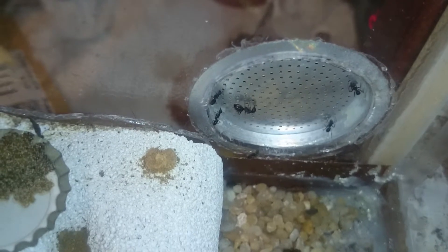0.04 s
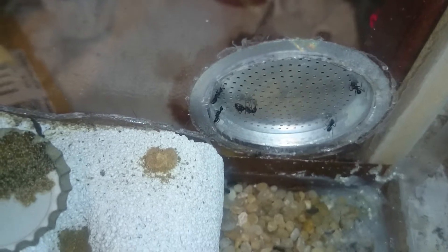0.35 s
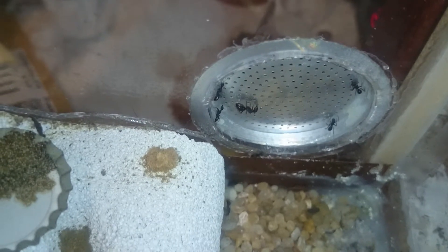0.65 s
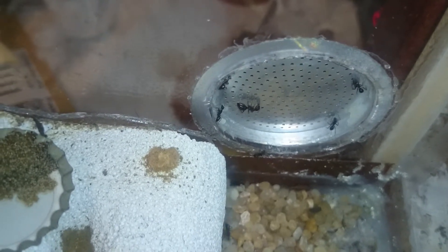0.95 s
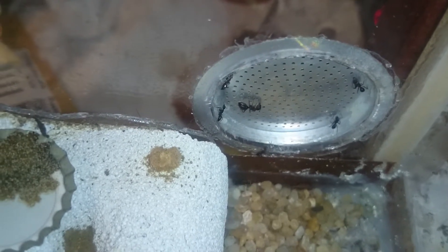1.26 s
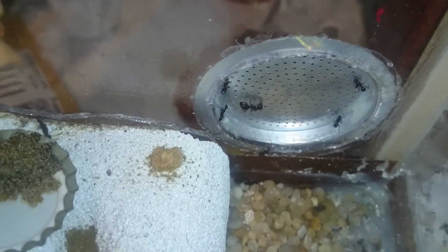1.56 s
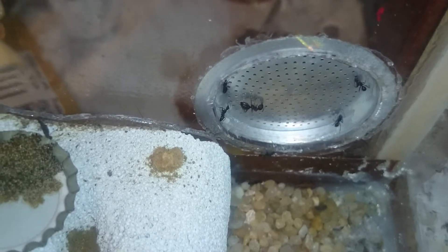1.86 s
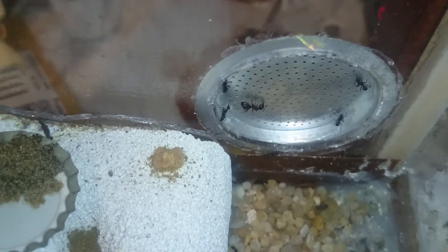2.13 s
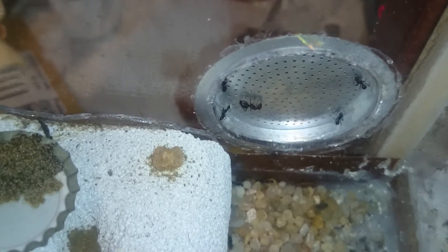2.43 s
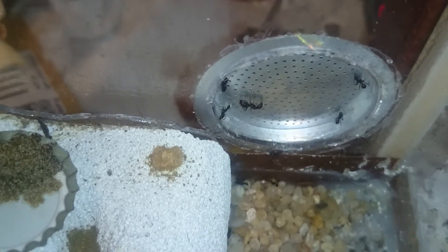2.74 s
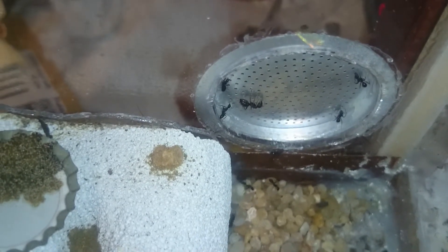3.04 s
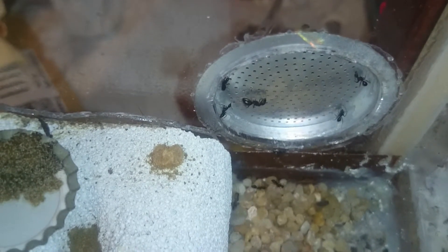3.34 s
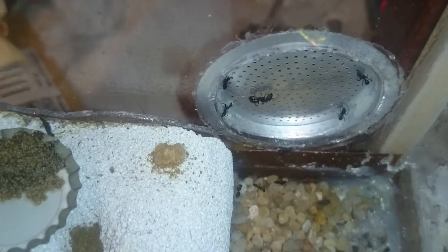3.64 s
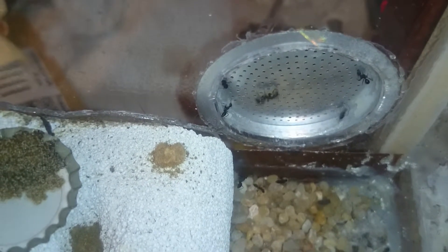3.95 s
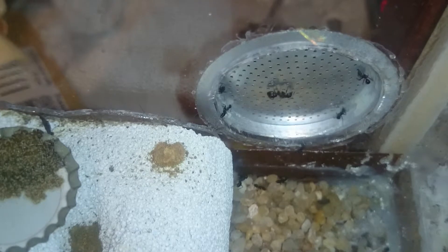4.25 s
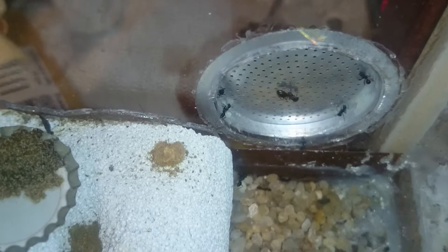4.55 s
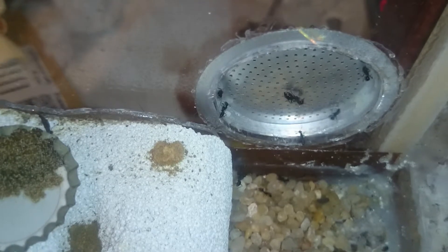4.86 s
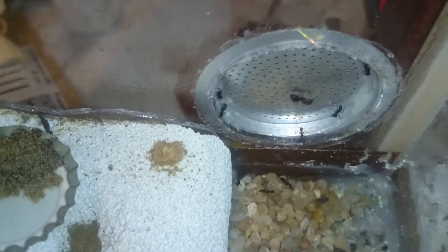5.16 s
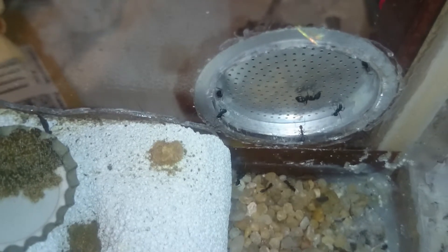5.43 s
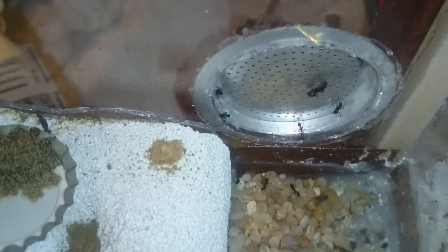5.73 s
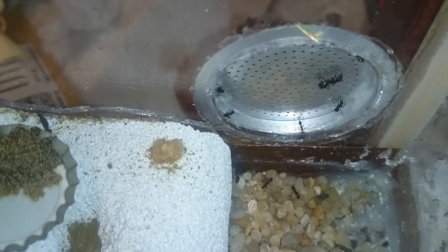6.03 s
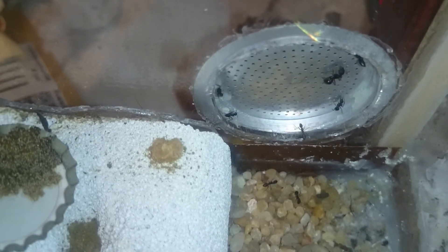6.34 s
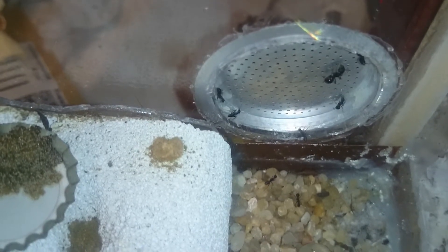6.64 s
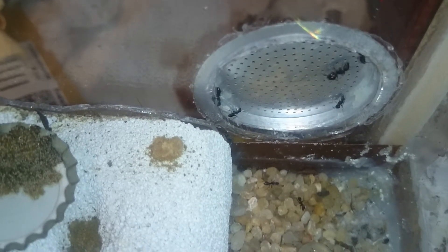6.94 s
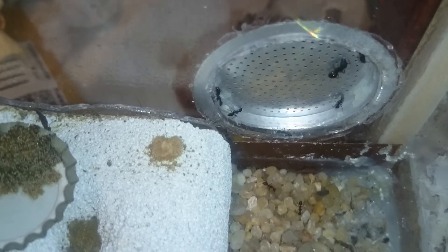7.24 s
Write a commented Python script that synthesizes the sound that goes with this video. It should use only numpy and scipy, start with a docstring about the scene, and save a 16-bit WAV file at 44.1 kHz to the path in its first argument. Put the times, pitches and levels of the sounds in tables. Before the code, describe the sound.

Dull bumps and a wavering low rumble come from fingers shifting on a camera, right against its microphone. Behind them lies quiet indoor hum and hiss. Midway, the lens mechanism clicks several times, tiny and crisp, a little to the left. A couple of seconds later it ticks again, brighter, and the hand bumps and brushes the case to close.

```python
"""A quiet room, a hand-held camera close up on ants, heard through its own two microphones.
Behind everything lie a low room murmur, a faint far drone and microphone hiss.
Against the right microphone the hand sways and bumps softly on the case.
Close to the left one come small sharp ticks and faint high whirrs, most likely the lens drive
hunting for focus: the lens chatters in its guide and rings the barrel."""
import sys
import numpy as np
from scipy import signal
from scipy.fft import rfft, irfft
from scipy.io import wavfile
from scipy.ndimage import uniform_filter1d

SR = 44100
rng = np.random.default_rng(int(sys.argv[2]) if len(sys.argv) > 2 else 0)


def generate_wav(sig):
    """Save sig (samples, or channels by samples) to the path in sys.argv[1] as 16-bit PCM at SR."""
    pcm = np.round(np.clip(np.atleast_2d(sig).T, -1, 1) * 32767).astype(np.int16)
    wavfile.write(sys.argv[1], SR, pcm)


N = 330309
TIME = np.arange(N) / SR


def amp(db):
    """Decibels to gain."""
    return 10 ** (np.asarray(db) / 20)


def unit_rms(x):
    """Scales to an rms of 1."""
    return x / np.sqrt(np.mean(x ** 2) + 1e-30)


def add(mix, start_s, sound):
    """Mixes a sound in at start_s."""
    part = mix[max(round(start_s * SR), 0):][:len(sound)]
    part += sound[:len(part)]


def colour(points, hz):
    """Gain of a table of f/Hz, level/dB, joined on a log-frequency axis."""
    f, db = np.transpose(points)
    return amp(np.interp(np.log(hz + 1), np.log(f + 1), db))


def noise(density):
    """Steady noise from a table of f/Hz, density/(dB per Hz)."""
    gain = colour(density, np.fft.rfftfreq(N, 1 / SR))
    return irfft(rfft(rng.standard_normal(N)) * gain, N) * np.sqrt(SR / 2)


def fuzzy_tone(hz, width_hz):
    """A narrow resonance kept ringing by noise, at an rms of 1."""
    offset = (np.fft.rfftfreq(N, 1 / SR) - hz) / width_hz
    return unit_rms(irfft(rfft(rng.standard_normal(N)) / (1 + (2 * offset) ** 2) ** .75, N))


def swells(rows):
    """An envelope of soft-edged swells from rows of middle t/s, length/s, level/dB."""
    level = np.zeros(N)
    for middle, length, db in rows:
        add(level, middle - length / 2, amp(db) * signal.windows.tukey(int(length * SR), .5))
    return level


def wander(count):
    """A smooth curve of rms 1 through count random points across the scene."""
    return unit_rms(signal.resample(rng.standard_normal(count), N))


# Faint hum in the room: f/Hz, level/dB
HUM_TONES = [(50, -66), (74, -73.5)]
# A far drone coming and going: middle t/s, length/s, level/dB
DRONE_SWELLS = [(3.55, 0.42, -68.5), (4.25, 0.42, -70), (6.45, 0.45, -68.5)]
# Its partials: f/Hz, width/Hz, relative level/dB
DRONE_PARTIALS = [(80.7, 6, 3.5), (171.6, 31, -9), (306, 18, -14)]
# Low tones surfacing briefly: middle t/s, length/s, level/dB, f/Hz
BRIEF_TONES = [(2.46, 0.21, -77.5, 298), (3.93, 0.14, -76.5, 462), (4.306, 0.1, -75, 384),
               (6.66, 0.2, -72.5, 323)]
# Steady murmur and hiss at the left microphone: f/Hz, density/(dB per Hz)
FLOOR_LEFT = [(8, -99.5), (35, -72.5), (70, -87.5), (110, -87), (200, -93), (400, -98), (700, -105),
              (1200, -110), (2800, -114), (6000, -119), (12500, -119.5), (15500, -124)]
# The same at the right microphone: f/Hz, density/(dB per Hz)
FLOOR_RIGHT = [(30, -76.5), (70, -84.5), (110, -87), (200, -95), (400, -99.5), (700, -104), (1200, -108),
               (2800, -111), (5800, -115.5), (7500, -118.5), (11000, -120), (15500, -120.5)]


def room_tone():
    """Hum, drone and low tones reach both microphones alike; each has its own murmur and hiss."""
    hum = sum(amp(db) * fuzzy_tone(hz, width_hz=5.8) for hz, db in HUM_TONES)
    drone = sum(amp(db) * fuzzy_tone(hz, width) for hz, width, db in DRONE_PARTIALS)
    tones = sum(swells([swell]) * fuzzy_tone(hz, width_hz=42) for *swell, hz in BRIEF_TONES)
    floor = np.array([noise(FLOOR_LEFT), noise(FLOOR_RIGHT)])
    return floor + hum + swells(DRONE_SWELLS) * drone + tones


# Tremor of the hand at the right microphone, before wavering and lulls: t/s, level/dB
TREMOR_LEVELS = [(0, -39), (0.552, -38), (1.0, -36), (1.7, -39.5), (2.1, -33.5), (2.3, -44.5), (2.8, -37.5),
                 (3.2, -35), (3.7, -44), (4.0, -35), (4.3, -36.5), (4.9, -39), (5.35, -37), (5.7, -37.5),
                 (6.7, -38.5), (7.22, -41.5), (7.39, -28.5), (7.49, -26)]
# The hand goes still for a moment: middle t/s, length/s
HAND_LULLS = [(0.554, 0.13), (0.933, 0.096), (1.352, 0.12), (1.89, 0.096), (2.335, 0.082), (2.615, 0.088),
              (2.82, 0.18), (2.984, 0.064), (3.707, 0.088), (4.036, 0.067), (4.715, 0.16), (4.95, .2),
              (5.24, .14), (5.518, 0.091), (6.86, .1)]
# Slow pressure of the hand on the case: f/Hz, relative level/dB
PRESSURE_SPECTRUM = [(2, -12.5), (6, 0), (11, 2.5), (20, -5), (35, -24), (70, -31.5), (150, -43.5),
                     (400, -80)]
# The hand shifts its hold: middle t/s, length/s, level/dB
GRIP_SHIFTS = [(1.27, 0.12, -55), (1.61, .16, -50), (2.14, 0.069, -52), (2.27, 0.06, -57),
               (2.42, 0.1, -48.5), (2.53, 0.082, -46), (2.68, 0.085, -48), (2.91, 0.1, -60),
               (3.13, 0.19, -54), (3.27, .1, -54), (3.8, .1, -58.5), (4.2, 0.12, -56), (4.39, 0.11, -48),
               (5.35, 0.069, -51), (5.95, 0.18, -53), (6.15, 0.11, -53.5), (6.31, 0.098, -50),
               (6.72, 0.12, -51.5), (7.1, 0.12, -51)]
# The case flexing under those shifts: f/Hz, relative level/dB
FLEX_SPECTRUM = [(12, -14), (28, -4), (48, 6), (80, -10), (130, -21.5), (300, -34.5), (1000, -70)]
# The hand brushes the case: middle t/s, length/s, level/dB
HAND_BRUSHES = [(7.41, 0.28, -71.5)]
# The sound of that brush: f/Hz, relative level/dB
BRUSH_SPECTRUM = [(100, -14), (300, 3), (800, -1), (1400, -6), (3000, -19), (8000, -47)]


def hand_sway(waver_db=1.5, lull_db=6):
    """Handling noise: a trembling hand rumbles very low, flexes the case and brushes over it."""
    tremor_db = np.interp(TIME, *np.transpose(TREMOR_LEVELS)) + waver_db * wander(count=90)
    still = swells([(middle, length, 0) for middle, length in HAND_LULLS])
    rumble = unit_rms(noise(PRESSURE_SPECTRUM)) * amp(tremor_db - lull_db * still)
    flex = swells(GRIP_SHIFTS) * unit_rms(noise(FLEX_SPECTRUM))
    brush = swells(HAND_BRUSHES) * unit_rms(noise(BRUSH_SPECTRUM))
    return rumble + flex + brush


def jolt(t, half_time_ms, push):
    """A to-and-fro pressure pulse around t = 0; one-way push changes its shape, not its energy."""
    u = t * 1000 / half_time_ms
    return (push + u * np.sqrt(np.e)) * np.exp(-u ** 2 / 2) / np.sqrt(push ** 2 + np.e / 2)


def bounce(t, hz, loss_db_per_cycle=5.5):
    """A few dying swings of the case in the grip, easing in over the first half cycle."""
    cycles = np.maximum(t, 0) * hz
    ease_in = np.sin(np.pi * np.minimum(cycles, .5)) ** 2
    return ease_in * amp(-loss_db_per_cycle * cycles) * np.cos(2 * np.pi * cycles)


# Fingers on the case, right against the microphone: t/s, level/dB, contact half-time/ms,
# one-way push/ratio (negative = letting go), bounce f/Hz, bounce level/dB re the jolt
FINGER_BUMPS = [(0.203, -28.5, 4.2, 7, 50, -24), (0.744, -34, 4.2, 0.5, 74, -5.5),
                (.840, -37.5, 1.6, 3, 90.5, -15), (1.007, -25.9, 1.14, -0.4, 172, -7.5),
                (1.037, -33.5, 1.9, -1.5, 110, -13), (1.075, -31.5, 3.1, 1.5, 70, -12),
                (1.091, -48, 1.5, 3, 160, -13), (1.147, -33.5, 3.2, 0.8, 44, -5.5),
                (1.444, -37, 2.1, 4.5, 101, 0.5), (1.764, -34, 2.44, 1.5, 40, -8),
                (1.979, -38.5, 1.9, -1, 99, -12), (2.0687, -43.5, 0.39, 1, 180, -20),
                (2.071, -31, 1.28, -0.5, 180, -9.5), (3.585, -32.3, 1.8, 2.9, 74, -5),
                (4.2847, -29.5, 3.8, 6, 27, -4), (4.533, -35.5, 1.34, 0.5, 47, -2),
                (4.779, -33.5, 1.38, 2.5, 47, -20), (5.619, -35, 1.21, 0.5, 42.7, -4),
                (5.777, -37, 1.14, 3.5, 139, -16), (5.789, -37.5, 1.45, -1.5, 130, -13),
                (5.8, -35, 1.26, 8, 43.3, -3), (6.427, -35.5, 2.3, -2, 60, -3),
                (6.546, -40.5, 0.87, 3, 57, -15), (6.549, -28, 2.16, 8, 58, -18),
                (7.335, -38, 2.7, -1.5, 60, -5), (7.373, -28.5, 2.5, 7, 32.7, -4)]
# Modes of the case: f/Hz, relative level/dB, t60/s
CASE_MODES = [(128.8, -27.5, 0.21), (180, -36, 0.12), (417, -18, 0.046), (765, -20, 0.041)]


def finger_bumps(tap_db=-34, tap_speed_db=-27.5, tap_growth=2.76, rub_db=-28, rub_s=.038):
    """A soft finger jolts and rubs the case, which bounces and rings; quick contacts tap hard."""
    lead_s, tap_early_s = .06, .00018
    t, knocks, pressing = np.arange(SR // 4) / SR, np.zeros(N), np.zeros(N)
    since_contact = t - lead_s
    for at, db, contact_ms, push, bounce_hz, bounce_db in FINGER_BUMPS:
        speed_db = db - 20 * np.log10(contact_ms)
        tap_gain = amp(tap_db + tap_growth * (speed_db - tap_speed_db))
        tap = tap_gain * jolt(since_contact + tap_early_s, half_time_ms=.44, push=0)
        swing = np.sign(push) * amp(bounce_db) * bounce(since_contact, bounce_hz)
        add(knocks, at - lead_s, amp(db) * (jolt(since_contact, contact_ms, push) + swing) + tap)
        add(pressing, at - lead_s, amp(db) * np.exp(-abs(since_contact) / rub_s))
    ring = sum(amp(db - 60 * t / t60) * np.sin(2 * np.pi * hz * t) * 2 * np.pi * hz / SR
               for hz, db, t60 in CASE_MODES)
    return knocks + signal.fftconvolve(knocks, ring)[:N] + amp(rub_db) * skin_rub(pressing)


# Skin on the case: f/Hz, relative level/dB
SKIN_SPECTRUM = [(10, -7), (50, 1.5), (130, 1.5), (250, -8), (500, -21), (1000, -46), (4000, -92)]


def skin_rub(pressing):
    """Skin drags with a dull noise that follows the pressure of the finger."""
    return pressing * unit_rms(noise(SKIN_SPECTRUM))


# The lens slides, close to the left microphone: middle t/s, length/s, level/dB
LENS_SLIDES = [(.66, .35, -84), (1.41, 0.24, -80.5), (2.6, 1.3, -89), (4.14, .08, -80), (4.3, 0.061, -79.5),
               (5.62, .08, -83), (6.3, 0.3, -78)]
# The sound of its sliding: f/Hz, relative level/dB
SLIDE_SPECTRUM = [(1000, -14), (2700, -4), (4500, -3), (6000, -1), (7300, -2), (8700, 6), (10500, -10),
                  (13000, -10), (16000, -8)]


def lens_rustle(grain=.46):
    """The lens slides in its guide; tiny catches make the faint rustle grainy."""
    catches = np.exp(grain * unit_rms(uniform_filter1d(rng.standard_normal(N), size=200)))
    return swells(LENS_SLIDES) * unit_rms(noise(SLIDE_SPECTRUM) * catches)


# Focusing moves, close to the left microphone: middle t/s, length/s, level/dB
FOCUS_MOVES = [(0.252, 0.13, -81), (.58, .04, -81), (1.26, 0.13, -79), (1.538, 0.058, -80),
               (2.01, 0.063, -76.5), (2.172, 0.083, -79), (2.49, .04, -80), (2.91, 0.13, -82),
               (3.18, 0.1, -80), (3.61, 0.12, -80.5), (3.985, 0.14, -79), (4.3, 0.055, -82),
               (4.543, 0.15, -84), (4.97, 0.1, -79.5), (5.24, 0.051, -83), (5.61, 0.072, -79),
               (6.28, 0.09, -78), (6.795, 0.064, -76.5), (7.15, 0.091, -85)]
WHIRR_HZ, BLIP_HZ, WHINE_HZ = 8230, 8510, 9380  # pitches at t = 0


def lens_drive(twitch_s=.035, twitch_db=-85, flutter_db=2, blip_s=.045, blip_db=-84,
               whine_db=-88.5, waver_db=2, dip_db=10, rise_hz_per_s=14):
    """The drive whirrs raggedly as the focus moves or twitches, over regular blips and a thin whine."""
    twitches = [(at, twitch_s, twitch_db) for at in rng.uniform(0, N / SR, size=12)]
    ragged = fuzzy_tone(WHIRR_HZ, width_hz=175) * amp(flutter_db * wander(count=600))
    whirr = swells(FOCUS_MOVES + twitches) * unit_rms(ragged)
    blip_times = np.arange(.44, N / SR, step=1.003)
    blips = swells([(at, blip_s, blip_db) for at in blip_times]) * fuzzy_tone(BLIP_HZ, width_hz=77)
    # the whine fades in at first and drops during each focusing move
    fade_db = np.interp(TIME, [0, 2], [-3, 0])
    moving = np.minimum(swells(FOCUS_MOVES) / amp(twitch_db), 1)
    whine_gain = amp(whine_db + fade_db + waver_db * wander(count=70) - dip_db * moving)
    whine = whine_gain * fuzzy_tone(WHINE_HZ, width_hz=77)
    # all three creep upward in pitch as the drive runs
    rise = np.exp(1j * np.pi * rise_hz_per_s * TIME ** 2)
    return (signal.hilbert(whirr + blips + whine) * rise).real


def mount_buzz(t, rise_s, hz=4060, width_hz=130, t60=.055):
    """A springy part of the lens mount buzzes on after a tick, its phase jittering."""
    jitter = np.cumsum(rng.standard_normal(len(t))) * np.sqrt(2 * np.pi * width_hz / SR)
    return np.minimum(t / rise_s, 1) * amp(-60 * t / t60) * np.sin(2 * np.pi * hz * t + jitter)


def chatter_envelope(t, length, attack_s=.0002, fade_db=6, rattle_db=-19, rattle_t60=.055):
    """The chatter starts at once, fades over its length and leaves a faint rattle."""
    chatter = np.clip((length - t) * SR, 0, 1) * amp(-fade_db * np.minimum(t / length, 1))
    rattle = amp(rattle_db - 60 * t / rattle_t60)
    return np.minimum(t / attack_s, 1) * np.maximum(chatter, rattle)


# Resonances of the lens barrel: f/Hz, width/Hz, relative level/dB
BARREL_MODES = [(3020, 240, -11.5), (5170, 200, -7), (5700, 200, -16), (6870, 300, -8.5), (7750, 200, -19),
                (8260, 130, 6), (8490, 110, -12), (9650, 250, -14), (10850, 300, -13), (11700, 400, -13)]
# Dry rasp of the chatter itself: f/Hz, relative level/dB
RASP_SPECTRUM = [(1000, -9), (3000, -8), (3550, -21), (4500, -11), (5300, -4), (6100, -20), (6850, 1.5),
                 (7700, -12), (10000, -17), (12400, -26), (13150, -20), (14000, -36), (14900, -36),
                 (16000, -25)]
# Lens ticks, close to the left microphone:
# t/s, level/dB, length/s, brightness/(dB per octave), body band gain/dB
LENS_TICKS = [(.617, -74, .006, 3, -3), (.666, -69, .0054, 8, 0), (3.8755, -58, 0.0056, 0.5, 1),
              (3.936, -49.5, 0.005, 3, 2), (4.0063, -47, 0.0058, 3, 2), (4.078, -54, 0.0046, -1, 3),
              (4.095, -64.5, 0.0049, 1, 0), (4.28, -66, .0036, 14, 0), (4.945, -74, .005, 4, 0),
              (5.249, -68.5, 0.0064, -3, 5), (6.184, -70, .004, 6, 2), (6.1895, -54.3, 0.0049, 16, -4),
              (6.1968, -57.5, 0.0075, 10, -1), (6.278, -53.5, 0.0043, 11, -3),
              (6.285, -57.5, 0.0071, 13, 0), (6.314, -68, 0.0027, 5, 0)]


def lens_ticks(grain=.069, top_hz=12500, body_hz=5100, body_half_width_hz=700,
               snap_db=-6, snap_s=.0007, buzz_db=-14, size=4096):
    """The lens slips with a bright snap, chatters for milliseconds in its guide and rings the barrel."""
    t, hz, out = np.arange(size) / SR, np.fft.rfftfreq(size, 1 / SR), np.zeros(N)
    # neighbouring modes move the microphone in opposite directions
    barrel = sum((-1) ** k * amp(db) / (1 + 2j * (hz - f) / width)
                 for k, (f, width, db) in enumerate(BARREL_MODES))
    barrel /= 1 + (hz / top_hz) ** 10
    octaves = np.log2(np.maximum(hz / WHIRR_HZ, 1 / 4))
    body_band = np.exp(-((hz - body_hz) / body_half_width_hz) ** 2)
    for at, db, length, brightness, body_db in LENS_TICKS:
        ring_db = 6.5 + .62 * (db + 60) - 1.27 * brightness  # hard, dull ticks ring the barrel most
        slips = rng.choice([-1, 1], (2, size)) * np.exp(grain * rng.standard_normal((2, size)))
        rasp_drive, ring_drive = rfft(slips * chatter_envelope(t, length))
        spectrum = rasp_drive * colour(RASP_SPECTRUM, hz) + amp(ring_db) * ring_drive * barrel
        tick = irfft(spectrum * amp(brightness * octaves + body_db * body_band))[:size // 2]
        add(out, at, amp(db) * tick * np.sqrt(length * SR / np.sum(tick ** 2)))
        snap = np.diff(slips[0], prepend=0) * np.exp(-t / snap_s)
        add(out, at, amp(db + snap_db) * snap)
        add(out, at, amp(db + ring_db + buzz_db) * mount_buzz(t, rise_s=length))
    return out


def scene(lens_leak_db=-25, bump_leak_db=-32):
    """Sound through the case reaches mostly the nearer microphone: lens left, hand right."""
    lens = lens_ticks() + lens_rustle() + lens_drive()
    bumps = finger_bumps()
    left = lens + amp(bump_leak_db) * bumps
    right = bumps + hand_sway() + amp(lens_leak_db) * lens
    return room_tone() + np.array([left, right])


def record(dry, edge_hz=15680):
    """The recorder's steep band limit, with a very short fade at each end."""
    lowpass = signal.ellip(10, .05, 60, edge_hz, fs=SR, output="sos")
    return signal.sosfiltfilt(lowpass, dry) * signal.windows.tukey(N, .002)


dry = scene()
out = record(dry)
generate_wav(out)
```